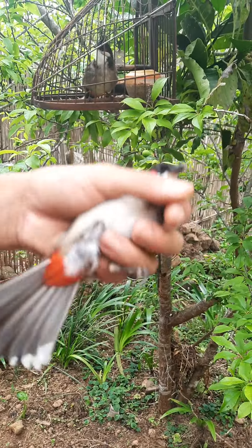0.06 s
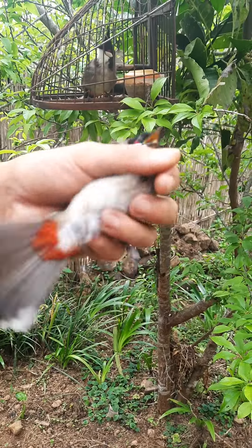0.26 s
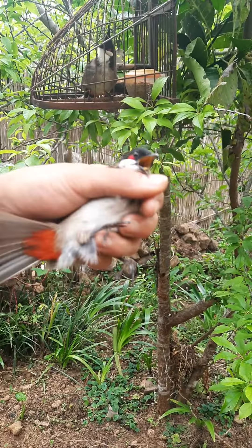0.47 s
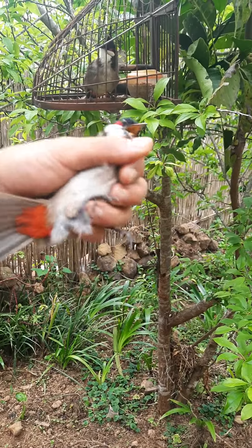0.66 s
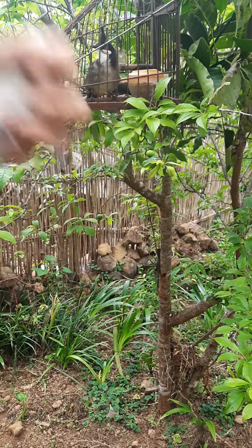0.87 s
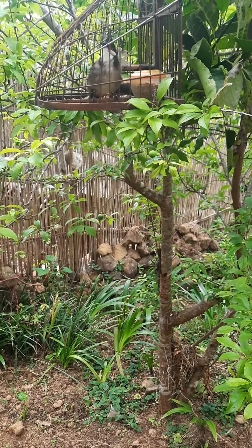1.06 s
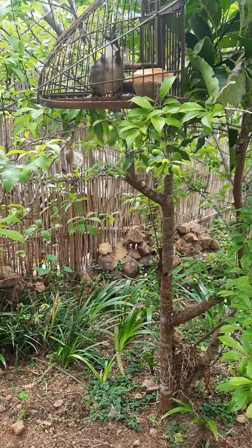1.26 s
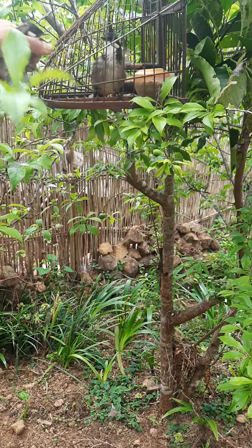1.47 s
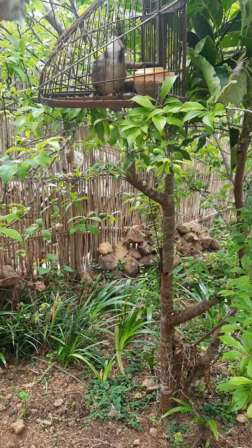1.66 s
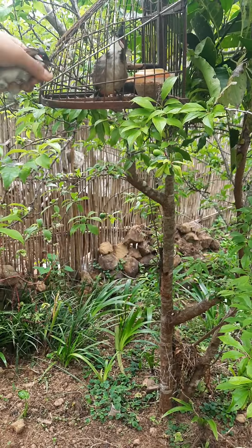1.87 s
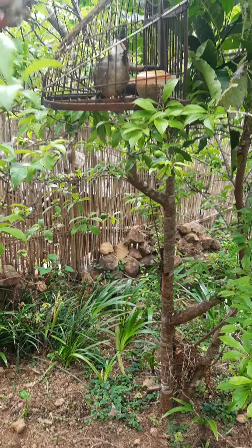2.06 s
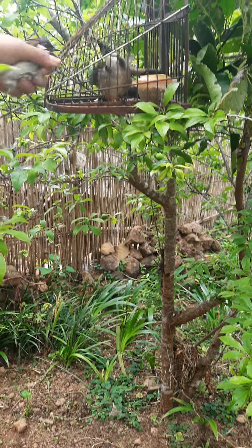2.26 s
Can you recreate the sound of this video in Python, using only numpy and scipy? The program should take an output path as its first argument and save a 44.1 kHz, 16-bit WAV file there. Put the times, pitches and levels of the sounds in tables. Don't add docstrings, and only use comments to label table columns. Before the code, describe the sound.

Close outdoor sound of a small songbird scolding in distress: two loud raspy rising cries, a weaker third, then a short cut-off fourth, over very soft garden air, low hum and distant insects.

```python
import sys
import numpy as np
from scipy import signal
from scipy.fft import rfft, irfft, next_fast_len
from scipy.io import wavfile
from scipy.ndimage import uniform_filter1d, map_coordinates

SR = 44100
rng = np.random.default_rng(int(sys.argv[2]) if len(sys.argv) > 2 else 0)


def unload_wav(signal):
    wavfile.write(
        sys.argv[1],
        SR,
        np.round(np.clip(np.atleast_2d(signal).T, -1, 1) * 32767).astype(np.int16),
    )


def how_loud(loudness_db):
    steps = np.asarray(loudness_db, float) / 20
    return 10 ** steps


N = 101429

# f/Hz, level/dB per Hz
AIR = [(20, -41.5), (45, -12.5), (110, -16.5), (370, -14.5), (800, -24.5), (1600, -20.5), (4700, -33.5),
       (8400, -45), (16000, -41.5)]
# f/Hz, likeness/0-1
AIR_LIKENESS = [(60, 0.3), (240, 0.8), (950, 0.19), (3770, 0.13), (15000, 0.01)]
# f/Hz, width/Hz, level/dB, silent after t/s
DRONES = [
    (6400, 600, -77.5, 3),
    (2770, 210, -77, 0.15),
    (4000, 210, -91, .16),
    (105, 13, -78.5, 3),
]

# t/s, level/dB, pitch f/Hz, half-pitch strength/ratio, breath level/dB, beak opening/dB
CALL_A = [(.105, -62.5, 971, 0.56, -10, 5), (0.17, -35.5, 1154, 0.32, -26, 10.5),
          (0.198, -28.5, 1236, 0.43, -3, 3.5), (0.269, -21.5, 1378, 0.93, 2, -11.5),
          (0.328, -18.5, 1517, 0.45, 3, 2), (0.375, -22, 1706, 0.76, -16.5, 0.5),
          (0.399, -21.5, 1860, 1, -16, 0.5), (0.43, -22, 2008, 1, -1.5, 6),
          (0.52, -21, 2015, 0.78, 4.5, 4.5), (.56, -21, 2000, 0.54, -26, 8.5),
          (0.616, -22, 2075, 0.47, -27.5, 2)]
CALL_B = [(0.763, -57.5, 1755, 0.84, 8, -6.5), (.8, -30, 1630, 0.78, -6, -7.5),
          (0.876, -21, 1474, 0.61, 1, -2.5), (0.931, -16.5, 1551, 0.28, -7, -7),
          (1.032, -21, 1594, 0.42, -16, 0), (1.059, -22.5, 1457, 0.58, 12, -1),
          (1.109, -24, 1398, 0.17, 8.5, -18), (1.147, -25, 1602, 0.83, -14, -8),
          (1.191, -20, 1727, 0.13, -12, 1), (1.205, -25, 1491, 0.91, -1, 3),
          (1.271, -24.5, 1725, 0.067, -18, 0.5), (1.341, -26.5, 2008, 0.13, 6.5, 0)]
CALL_C = [(1.487, -58.5, 1223, .3, 13, -3), (1.527, -41, 1711, 0.34, 4, -1),
          (1.59, -33, 1801, 0.17, -2.5, -2.5), (1.651, -31, 1603, 0.35, -10.5, -0.5),
          (1.69, -32.5, 1756, 0.68, -12, -8.5), (1.709, -33, 2006, 2.3, -13, -9.5),
          (1.76, -31.5, 2089, 2.4, 1, -13.5), (1.818, -30, 1966, 1.15, 12, -7.5),
          (1.895, -30, 1877, 0.76, -19, -2.5), (1.972, -26.5, 2120, 0.24, -24, -3.5),
          (1.983, -31.5, 1960, 0.45, 4, -8)]
CALL_D = [
    (2.187, -72.5, 1316, 0.22, 11, -1),
    (2.234, -48.5, 1557, 0.096, -9, -1.1),
    (2.254, -41, 1732, 0.46, -5, -0.51),
    (2.298, -35.5, 1856, 0.33, -1, -0.99),
]
# f/Hz, level/dB
THROAT_A = [(600, -33.5), (1000, -10.5), (1500, -21), (2000, -9.5), (3000, -1), (4100, -6), (5200, -9),
            (7300, -21), (9500, -25), (15000, -24.5)]
THROAT_B = [(600, -66), (1100, -34.5), (1550, -24.5), (2000, -16.5), (3150, -4.5), (3900, -17.5),
            (5500, -16), (7000, -24), (10500, -29), (15000, -26)]
THROAT_C = [(600, -70), (1000, -37.5), (1500, -13.5), (2000, -10), (3700, 0), (5100, -18), (6500, -5),
            (8300, -15.5), (11000, -9.5), (15000, -23)]
THROAT_D = [(600, -69.5), (1000, -52.5), (1600, -6.5), (2400, 1.5), (3500, -9), (5100, -15.5),
            (7000, -12.5), (11000, -17), (15000, -24.5)]
# f/Hz, depth/share of pitch
FLUTTERS = [
    (95, .036),
    (105, .04),
    (120, .035),
    (125, .035),
]
RAGGED_S = [.085, .028, .03, .055]
MUFFLED_S = [0.12, .004, 0.0087, 0.014]
# order of the line, level/dB
HALF_PITCH = [(1, -22.5), (3, -7.5), (5, -0.5)]
# f/Hz, level/dB
BREATH_TILT = [(1200, -42), (2500, -22), (3600, -5), (7000, 0)]
# f/Hz, level/dB
WINDPIPE = [(3300, 0), (3700, -4), (4200, 4), (4650, -4), (5100, 4), (5600, -1.5), (6000, 0)]

# f/Hz, right lag early/rad, late/rad, left minus right early/dB, late/dB
PORTS_A = [(990, 0.87, 0.45, 1, -1.5), (1580, 2.5, 0.36, -2.5, 15.5), (2483, 1.09, 1.2, 3, 0),
           (3056, 3.88, 3.4, -9, -4.5), (4070, 5.25, 5.08, -1.5, -3), (5060, 7.06, 6.5, -3.5, -2.5),
           (6230, 10.18, 9.5, 1, 5.5), (6900, 9.42, 8.2, 0, 0), (7500, 9.42, 9.2, 0, 0),
           (8200, 9.6, 9.6, 0, 0), (8430, 11.9, 10.6, 10.5, 6.5), (11940, 15.4, 17, 26, 19.5),
           (14840, 23, 23, 20, 29)]
PORTS_B = [(967, -3, -6.5, 13, 5.5), (1814, -1.5, -0.5, -11, -3.8), (2150, -3.1, -3.1, 0, 0),
           (2400, -3.1, -2, 0, 0), (3340, 1.6, 0, -8, -1.5), (4315, 1, 7, 1.5, -2.5),
           (5460, 5.5, 9, -13, -3), (6520, 12, 5.5, -1.5, -6), (6900, 9.42, 9.8, 0, 0),
           (8100, 16, 14, 8.5, -0.5), (9480, 19.5, 16.5, 12, 17), (12000, 20, 18.5, 17, 11.5),
           (15444, 24, 29.5, 27.5, 11.5)]
PORTS_C = [(1032, -6.5, -6.5, 4, -16), (1836, 2.5, -4.5, -8.5, -4), (2350, -3.1, -3.5, 0, 0),
           (2600, -3.1, -3.1, 0, 0), (3030, -1.5, -1.7, -13, -7.5), (3910, 1.67, 1.67, 0.5, -1.5),
           (5440, 5, 1, -3.5, -6.5), (6340, 9, 5.5, -10.5, -4.5), (6660, 6.5, 8.5, -6, -1.5),
           (7900, 6, 8, 5, 1), (9100, 9.5, 8, 6, 8), (12030, 16, 15, 11, 10.5), (15800, 24, 19, 14, 25)]
# from t/s, to t/s
TURNS = [
    (0.301, 0.49),
    (.95, 1.13),
    (1.618, 1.725),
    (2.101, 2.32),
]
# f/Hz, level/dB
MIC = [(8000, 0.85), (10000, 2), (12700, -5.5), (14200, -0.5), (15500, 5)]

# t/s, length/s, level/dB, first f/Hz, last f/Hz, breath level/dB
SQUEAKS = [
    (1.364, 0.04, -49.5, 1412, 1494, 18),
    (2.071, 0.061, -54, 1378, 1593, -24),
]
# f/Hz, level/dB
SQUEAK_THROAT = [(900, -20), (1500, 9), (3100, -8.0), (4500, -6), (16000, -48)]


def evened(x):
    return x / np.sqrt(np.mean(x ** 2) + 1e-20)


def read(points, hz):
    f, value = np.transpose(points)
    return np.interp(np.log(hz + 1), np.log(f + 1), value)


def add(mix, s, sound):
    part = mix[..., round(s * SR):][..., :sound.shape[-1]]
    part += sound[..., :part.shape[-1]]


def colour(x, points):
    size = next_fast_len(len(x) + 2048)
    hz = np.fft.rfftfreq(size, 1 / SR)
    return irfft(rfft(x, size) * how_loud(read(points, hz)), size)[:len(x)]


def lowpass(x, hz, order=2):
    return signal.sosfiltfilt(signal.butter(order, hz, fs=SR, output="sos"), x)


def fuzzy(count, hz, width):
    r = np.exp(-np.pi * width / SR)
    settle = 9000
    swing = rng.standard_normal((2, count + settle))
    swing = signal.lfilter([1], [1, -2 * r, r * r], swing, axis=1)[:, settle:]
    turn = 2 * np.pi * hz * np.arange(count) / SR
    return evened(swing[0] * np.cos(turn) + swing[1] * np.sin(turn))


def air():
    level_db, patchy_db = -70.5, 2.5
    frames, hz = N // 256 + 5, np.fft.rfftfreq(1024, 1 / SR)
    a, b, c, d, patches = rng.standard_normal((frames, 513, 5)).T
    patches = evened(uniform_filter1d(uniform_filter1d(patches, 8, 0), 10, 1))
    same = np.clip(read(AIR_LIKENESS, hz), -1, 1)[:, None]
    left = a + 1j * b
    right = same * left + np.sqrt(1 - same ** 2) * (c + 1j * d)
    z = np.array([left * how_loud(-1.5), right])
    z = z * how_loud(read(AIR, hz)[:, None] + patchy_db * patches)
    return how_loud(level_db) * evened(signal.istft(z, nperseg=1024, noverlap=768)[1][:, :N])


def drones():
    out = np.zeros((2, N))
    for f, width, db, until in DRONES:
        sides = np.array([fuzzy(N, f, width), fuzzy(N, f, width)])
        both = fuzzy(N, f, width) + 0.55 * sides
        band = signal.butter(2, [f * 0.93, f * 1.3], "band", fs=SR, output="sos")
        fade = np.clip((until - np.arange(N) / SR) / .05, 0, 1)
        out += how_loud(db) * signal.sosfilt(band, both) * fade
    return out


def smooth(count, n, size):
    x = rng.standard_normal((count, n))
    return evened(uniform_filter1d(uniform_filter1d(x, size, 1), size, 1))


def voice(hz, half, breath_db, throat, ragged_s, flutter_hz, depth):
    tremble_depth, wander_depth, ragged_depth = .008, 0.018, .22
    follow, shimmer, shimmer_hz = 0.12, 0.21, 360
    n, usual_hz = len(hz), np.median(hz)

    flutter = evened(np.tanh(fuzzy(n, flutter_hz, 110)))
    tremble = fuzzy(n, 370, 200)
    ragged = np.exp(-(np.arange(n) / SR / ragged_s) ** 4) * np.tanh(smooth(1, n, 30)[0])
    wander = smooth(1, n, 500)[0]
    bend = depth * flutter + tremble_depth * tremble + wander_depth * wander + ragged_depth * ragged
    fast = hz * (1 + bend)
    turns = np.cumsum(fast / 2) / SR

    k = np.arange(1, 35)[:, None]
    weak = np.clip(half, 0, 4) * how_loud(np.interp(k, *np.transpose(HALF_PITCH)))
    share = np.where(k % 2, weak, 1) * (k * fast / 2 < 17000)
    throat_hz = k * hz / 2 * (usual_hz / hz) ** (follow * (k < 9))
    share = share * how_loud(read(throat, throat_hz))
    share = share * (1 + shimmer * np.sqrt(k / 4) * smooth(len(k), n, int(SR / shimmer_hz)))
    folds = (share * np.cos(2 * np.pi * k * turns + 0.27 * k * k)).sum(0)

    puffs = (.5 + np.exp(-(2 * turns % 1) / .3)) * rng.standard_normal(n)
    puffs = 2.2 * colour(colour(evened(puffs), throat), BREATH_TILT)
    x = folds + how_loud(np.minimum(breath_db, 2)) * puffs
    x = how_loud(1.6 * np.minimum(flutter, 1)) * x
    return colour(x, [(.5 * usual_hz - 350, -40), (.5 * usual_hz, 0)])


def scream(rows, throat, ragged_s, flutter, muffled_s):
    drop_s, drop, close_db = .017, .52, -16
    muffle_hz, muffle_db, beak_hz = 3000, -14, 5930
    s, *cols = np.transpose(rows)
    t = np.arange(s[0], s[-1] + drop_s, 1 / SR)
    db, hz, half, breath_db, beak_db = (np.interp(t, s, c) for c in cols)
    end = np.clip((t - s[-1]) / drop_s, 0, 1)

    x = voice(hz * (1 - drop * end), half, breath_db, throat, ragged_s, *flutter)
    x = colour(x, WINDPIPE)
    dull = lowpass(x, muffle_hz)
    muffle = np.exp(-((t - s[0]) / muffled_s) ** 4)
    x = dull + how_loud(muffle_db * muffle) * (x - dull)
    low = lowpass(x, beak_hz)
    x = low + how_loud(beak_db) * (x - low)

    x = x / np.sqrt(uniform_filter1d(x ** 2, size=1500) + 1e-20)
    fade_in = np.minimum((t - s[0]) / 0.0061, 1)
    return x * how_loud(db + close_db * end ** 3 - 51 * end ** 12) * fade_in


def ports(x, start, table, turn):
    near_db, sway_s = -20, 0.00012
    hz, t, z = signal.stft(colour(x, MIC), SR, nperseg=256, noverlap=224)
    f, *cols = np.transpose(table)
    lag, late_lag, db, late_db = (np.interp(hz, f, c)[:, None] for c in cols)
    turned = np.clip((start + t - turn[0]) / (turn[1] - turn[0]), 0, 1)
    lag = lag + (late_lag - lag) * turned
    db = db + (late_db - db) * turned
    z = np.array([z * how_loud(.35 * db), z * how_loud(-.65 * db) * np.exp(-1j * lag)])
    pair = signal.istft(z, SR, nperseg=256, noverlap=224)[1][:, :len(x)]

    out, t = pair.copy(), np.arange(len(x))
    for ear, late, rate, phase, sign in rng.random((8, 5)):
        side = int(ear * 2)
        sway = sway_s * np.sin(2 * np.pi * ((1 + 2 * rate) * t / SR + phase))
        at = t - SR * (0.000343 + 0.00186 * late + sway)
        bounce = map_coordinates(pair[side], [at], order=3)
        out[side] += how_loud(near_db) * np.sign(sign - .5) / 2 * bounce
    return out


def yard(x):
    level_db, t60_s = -25.5, .3
    t = np.arange(SR // 2) / SR
    tail = rng.standard_normal((2, len(t))) * how_loud(-60 * t / t60_s) * (t > .006)
    tail = signal.lfilter([.35], [1, -.65], tail / np.linalg.norm(tail[0]))
    return how_loud(level_db) * signal.fftconvolve(x, tail, axes=1)[:, :N]


def squeak(length, db, first_hz, last_hz, breath_db):
    u = np.arange(0, 1, 1 / (SR * length))
    hz = first_hz + (last_hz - first_hz) * np.sin(u * 1.8)
    x = voice(hz, 0, breath_db, SQUEAK_THROAT, 0.011, *FLUTTERS[2])
    return how_loud(db) * evened(x) * np.sin(np.pi * u ** 1.64) ** 0.39


def beak_tick():
    level_db, ring_hz, t60_s = -47, 1550, .008
    t = np.arange(300) / SR
    ring = np.sin(2 * np.pi * ring_hz * t) + 0.32 * rng.standard_normal(300)
    return how_loud(level_db - 60 * t / t60_s) * ring


def scene():
    bird = np.zeros((2, N))
    calls = [CALL_A, CALL_B, CALL_C, CALL_D]
    throats = [THROAT_A, THROAT_B, THROAT_C, THROAT_D]
    tables = [PORTS_A, PORTS_B, PORTS_C, PORTS_C]
    for i, rows in enumerate(calls):
        start = rows[0][0]
        call = scream(rows, throats[i], RAGGED_S[i], FLUTTERS[i], MUFFLED_S[i])
        add(bird, start, ports(np.pad(call, (0, 300)), start, tables[i], TURNS[i]))
    for start, *note in SQUEAKS:
        add(bird, start, ports(squeak(*note), start, PORTS_C, TURNS[3]))
    tick_s = 1.4345
    add(bird, tick_s, ports(beak_tick(), tick_s, PORTS_C, TURNS[3]))
    return air() + drones() + bird + yard(bird)


def roll_off(x):
    return signal.sosfilt(signal.butter(12, 17040, fs=SR, output="sos"), x)


def record(dry):
    gate_db, open_db, gate_hz, edge_hz = -4.5, -45, 1300, 15900
    power = uniform_filter1d((dry ** 2).mean(0), size=3000)
    power_db = 10 * np.log10(abs(power) + 1e-12)
    shut = uniform_filter1d(np.clip((open_db - power_db) / 15, 0, 1), size=2000)
    gated = dry + (how_loud(gate_db * shut) - 1) * lowpass(dry, gate_hz, order=3)
    edge = signal.firwin(511, edge_hz, window=("kaiser", 9), fs=SR)
    mix = signal.oaconvolve(gated, edge[None], "same")
    return roll_off(mix)


dry = scene()
out = record(dry)
unload_wav(out)
```